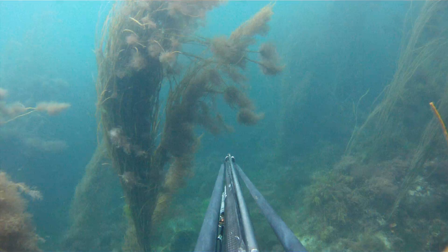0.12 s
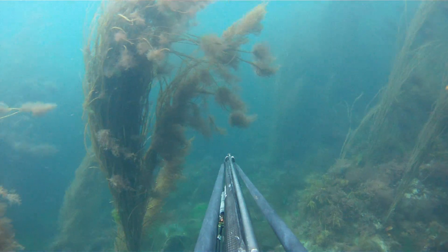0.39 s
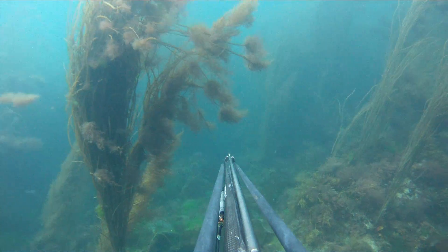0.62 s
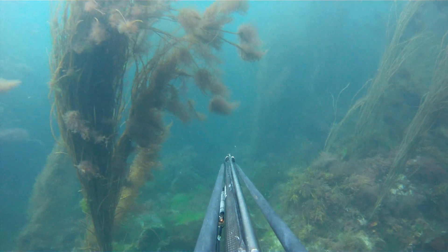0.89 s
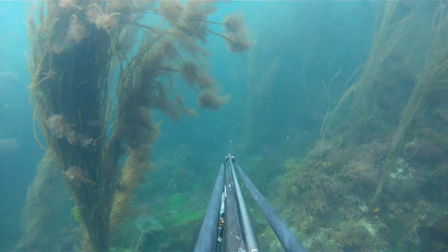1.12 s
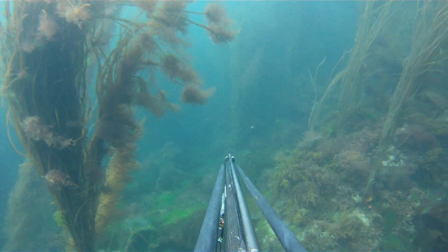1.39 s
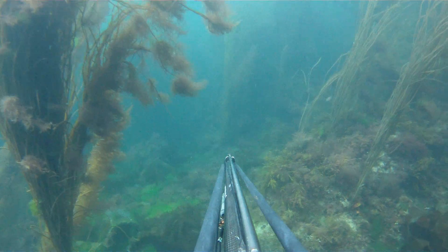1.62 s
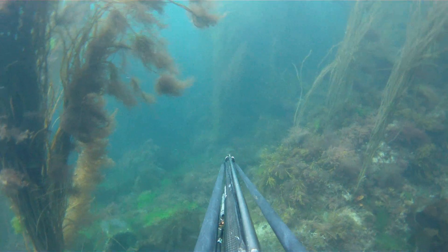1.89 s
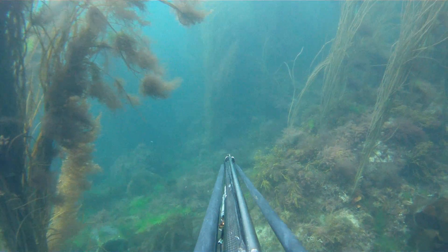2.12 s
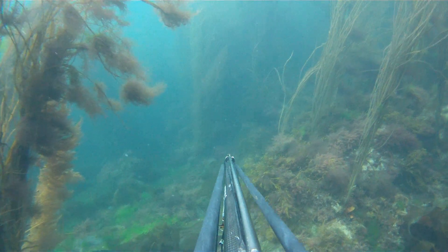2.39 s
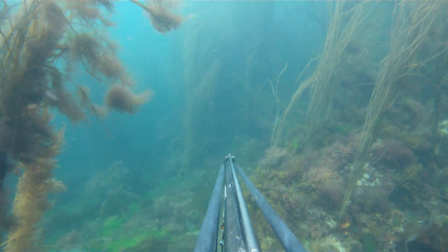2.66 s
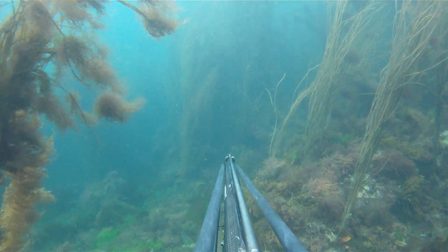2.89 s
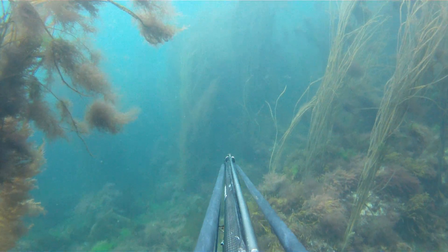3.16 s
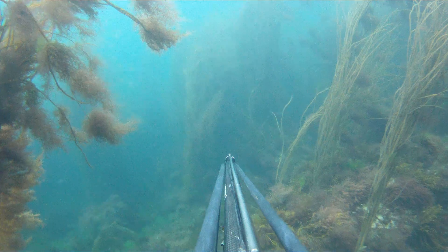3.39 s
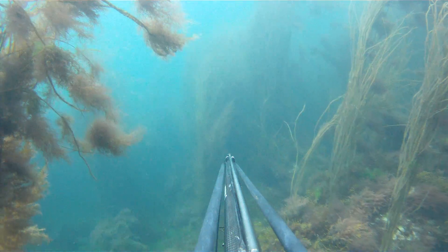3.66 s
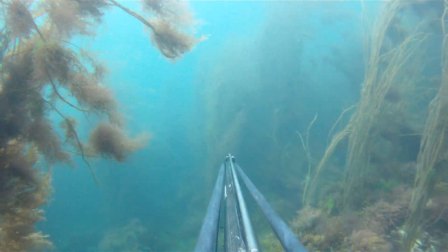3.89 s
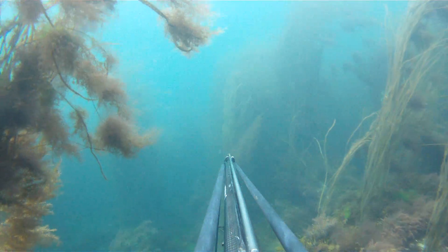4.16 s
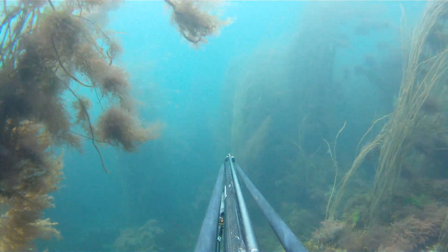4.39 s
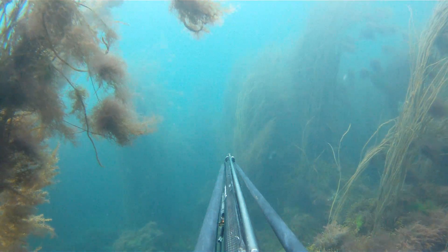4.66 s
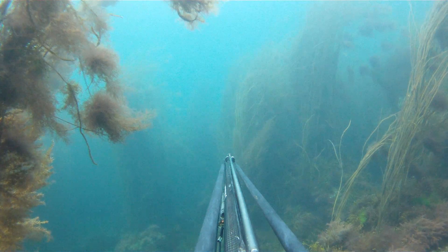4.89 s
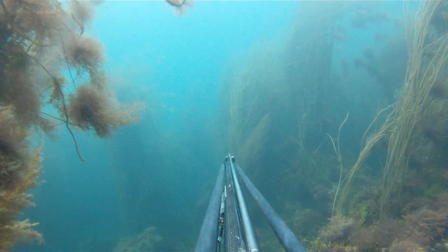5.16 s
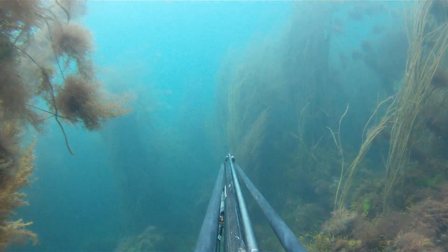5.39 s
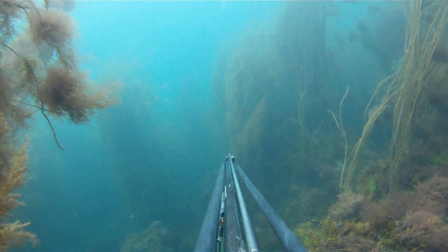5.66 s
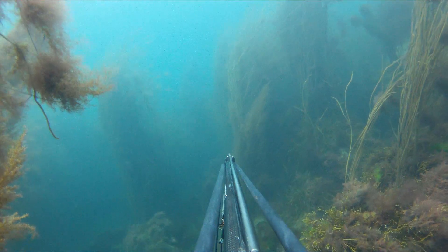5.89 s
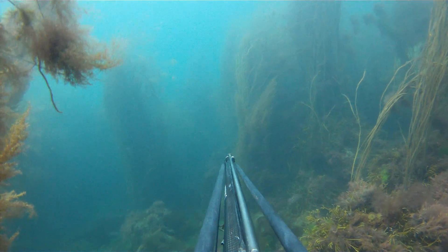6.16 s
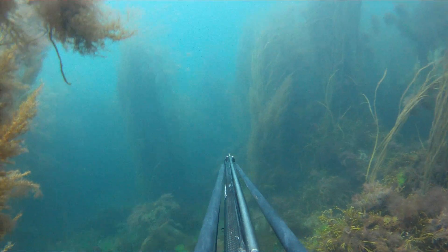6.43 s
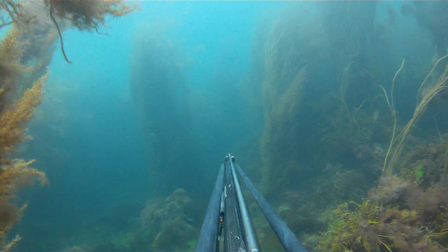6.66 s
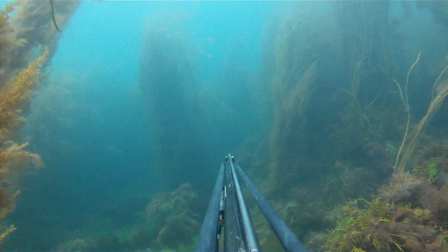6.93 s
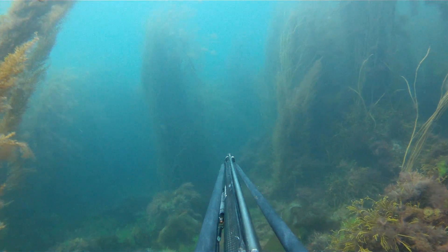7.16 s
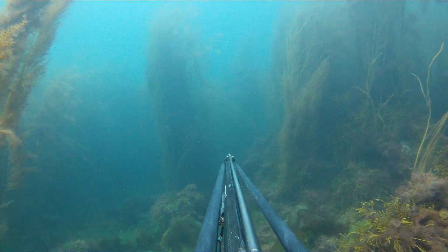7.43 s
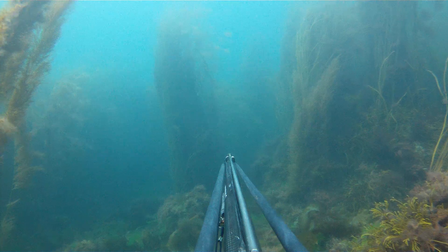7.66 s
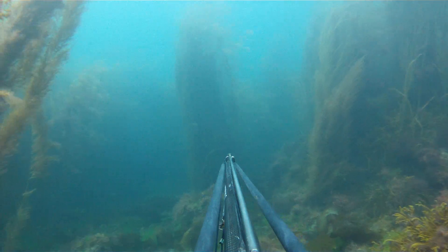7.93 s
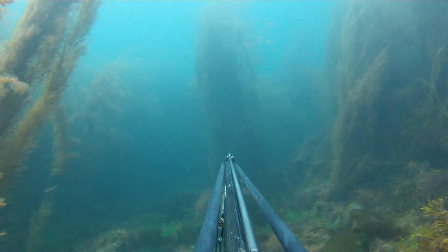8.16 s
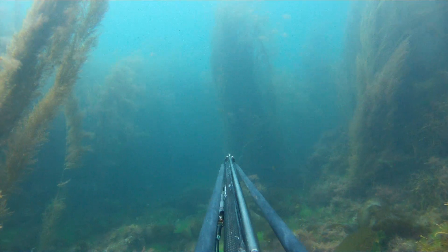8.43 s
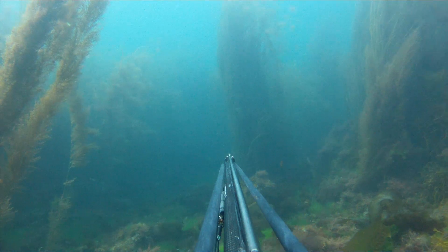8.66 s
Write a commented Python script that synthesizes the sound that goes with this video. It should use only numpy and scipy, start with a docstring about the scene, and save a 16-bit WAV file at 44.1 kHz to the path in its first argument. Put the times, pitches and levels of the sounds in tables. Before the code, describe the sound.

A diver's camera drifts through kelp, its one enclosed microphone giving a close, boxy, low-fidelity sound. Irregular taps and scraping from hand and gear come first over deep surging water. The handling settles, a hard crack breaks the quiet, then only faint clicks and scrapes remain until a weed brushes along the case and little bubbles plink away.

```python
"""Water rumbles deeply round a sealed plastic case while hand, gear and grit rub and tap it; later a hard snap,
a frond's slide and pinging bubbles. A camera in this case drifts through kelp on a diver's spear shaft.
Contacts are short forces driving damped modes of the case; water and friction are noise through resonances.
One microphone hears it all; its converter holds each sample at a low rate, mirroring the sound into the treble."""
import sys
import numpy as np
from scipy import signal
from scipy.fft import rfft, irfft
from scipy.io import wavfile
from scipy.ndimage import uniform_filter1d

SR = 44100
rng = np.random.default_rng(int(sys.argv[2]) if len(sys.argv) > 2 else 0)


def master(y):
    """Save y as 16-bit WAV."""
    cut = np.clip(np.atleast_2d(y).T, -1, 1)
    pcm = np.round(cut * 32767)  # scale
    wavfile.write(sys.argv[1], SR, pcm.astype(np.int16))


def convert_level_to_amplitude(level_db):
    """Map a level in decibels to its linear amplitude factor."""
    exponent = np.asarray(level_db, float) / 20
    return 10 ** exponent


N = 388080  # samples, 8.8 s
TIME = np.arange(N) / SR


def resonate(x, hz, t60):
    """Linear resonance: x drives one exponentially decaying mode; a unit impulse rings with peak about 1."""
    pole = np.exp(2j * np.pi * hz / SR - np.log(1000) / (t60 * SR))
    return signal.lfilter([1], [1, -pole], x).imag


def unit(x):
    """Normalisation: scale to rms 1."""
    return x / np.sqrt(np.mean(x ** 2))


def band(x, hz, width):
    """Bandwidth and decay are reciprocal: a resonance of given width in Hz, scaled to rms 1."""
    return unit(resonate(x, hz, np.log(1000) / (np.pi * width)))


def walk(rate):
    """Slow random modulation: levels held 1 / rate s and slewed twice; spread 1."""
    k = int(SR / rate)
    steps = np.repeat(rng.standard_normal(N // k + 1), k)
    slewed = uniform_filter1d(uniform_filter1d(steps, k), k)
    return unit(slewed[:N])


def curves(table):
    """Envelopes: gains at every sample, interpolated in dB, from each level column of a table."""
    s, *columns = np.transpose(table)
    return [convert_level_to_amplitude(np.interp(TIME, s, c)) for c in columns]


def add(out, s, x):
    """Superposition: mix a short sound in at time s."""
    i = int(s * SR)
    out[i:i + len(x)] += x[:N - i]


def ring(modes, turn, rise_s):
    """Modal superposition: modes struck together, each with its own phase; the contact takes rise_s to build."""
    hz, db, t60 = np.transpose(modes)[:, :, None]
    t = TIME[:SR // 4]
    tones = convert_level_to_amplitude(db - 60 * t / t60) * np.sin(2 * np.pi * (hz * t + np.reshape(turn, (-1, 1))))
    return tones.sum(axis=0) * (1 - np.exp(-t / rise_s))


# lower, hollow-sounding modes of the case: (frequency [Hz], level [dB], t60 [s])
HOLLOW_MODES = [(282.6, -5, 0.052), (503, -7.5, 0.052), (625.3, -0.5, 0.046), (721.6, -0.5, 0.055),
                (790, -0.5, 0.03)]
REGRIP_S, REGRIP_HZ, REGRIP_T60_S = 3.45, 830, 0.089  # the grip shifts and a main mode rises


def hollow_at(s):
    """Boundary conditions set the modes: the hollow modes as the grip at time s leaves them."""
    if s < REGRIP_S:
        return HOLLOW_MODES
    raised = (REGRIP_HZ, HOLLOW_MODES[3][1], REGRIP_T60_S)
    return HOLLOW_MODES[:3] + [raised] + HOLLOW_MODES[4:]


# upper modes of the case: (frequency [Hz], level [dB], t60 [s])
UPPER_MODES = [(1092, 1.5, 0.032), (1366, 3.5, 0.015), (1600, -3.5, 0.016), (2020, -1.5, 0.02),
               (2280, 1.5, 0.016), (2650, -1, 0.021), (3090, -3.5, 0.017), (3420, -5.5, 0.023),
               (3950, -9.5, 0.0079), (4780, -11.5, .012), (5240, -16.5, 0.024)]
# listed taps on the case:
# (time [s], hollow ring peak [dB], upper ring [dB re hollow], where the upper ring is strongest [Hz])
CASE_TAPS = [(0.112, -37, -5.5, 2650), (0.142, -47.5, 7, 2470), (0.219, -32, -5, 2380),
             (0.288, -31.5, -15, 2260), (0.298, -36, -3, 2020), (0.314, -24, -1, 2750),
             (0.347, -32.5, 2.5, 1400), (0.367, -38, -3, 1250), (0.456, -44.5, 5.5, 2500),
             (0.55, -28.5, 0, 1430), (0.578, -28.5, -6.5, 1550), (0.679, -37, 3, 1280),
             (0.854, -37.5, 2.5, 1400), (0.904, -40, 3, 2220), (0.924, -29.5, -3, 1250),
             (1.052, -30.5, -16, 1440), (1.082, -36, 2.5, 2280), (1.103, -27.5, -17, 1870),
             (1.18, -31.5, -6.5, 1270), (1.435, -30.5, -26, 2590), (1.677, -32.5, -14, 1800),
             (1.826, -38, 1, 2400), (1.853, -41, 0, 1310), (1.926, -38, 0.5, 2400), (1.937, -18, -14, 2230),
             (1.96, -33, -16, 1870), (1.973, -29.5, -19, 2200), (2.088, -30.5, -21, 1260),
             (2.236, -38, -1, 1840), (2.446, -44.5, 2, 2510), (2.871, -39, -2, 1250),
             (2.975, -41.5, -13, 1450), (3.111, -38.5, 5.5, 2400), (3.607, -41, -29, 1250),
             (3.746, -42, -1.5, 1467), (3.814, -43, -2, 1450), (3.908, -41, -9, 2040),
             (4.225, -41.5, -4.5, 2760), (4.267, -39, -2, 2480), (4.689, -44.5, -7, 2190),
             (4.913, -49, -5, 2980), (5.067, -46.5, 1.5, 2890), (5.229, -47, 2.5, 2310),
             (5.465, -47.5, 2, 2520), (5.554, -47.5, 2.5, 1630), (5.625, -37.5, -12, 1310),
             (6.015, -44, 5, 1460), (6.254, -42, 2, 1480), (6.288, -41.5, 3.5, 1400),
             (6.514, -43.5, 0, 3000), (6.61, -44, -1, 1250), (7.009, -44, -3.5, 2300),
             (7.084, -39.5, -8, 1290), (7.57, -44.5, -7.5, 1580), (7.706, -47, -0.5, 2400),
             (8.456, -34, -3, 1250), (8.546, -34, -10, 1270)]
FOCUS_DB_PER_OCTAVE = 7  # fall of the upper modes away from that frequency
CRACK_DB = -9.5  # dry contact crack re the upper ring


def taps():
    """Impact excitation: the place struck sets the mix of modes, slightly detuned; a rough contact drives them."""
    out = np.zeros(N)
    rows = CASE_TAPS + light_taps()
    chance = rng.standard_normal((200, 2, 3, len(UPPER_MODES)))
    rough = rng.standard_normal((200, 400)) ** 3 * np.exp(-TIME[:400] / 0.0015)  # spiky force
    bright = signal.butter(2, (2500, 5800), "band", fs=SR, output="sos")
    for (s, db, upper_db, focus_hz), draw, force in zip(rows, chance, rough):
        upper = [(hz, m - FOCUS_DB_PER_OCTAVE * abs(np.log2(hz / focus_hz)), t60)
                 for hz, m, t60 in UPPER_MODES]
        groups = ((hollow_at(s), db), (upper, db + upper_db))
        for (modes, group_db), (detune, spot, turn) in zip(groups, draw):
            struck = [(hz * (1 + .04 * a), m + 2.14 * b, t60)
                      for (hz, m, t60), a, b in zip(modes, detune, spot)]
            response = ring(struck, .15 * turn[:len(modes)], 0.00016)
            x = signal.fftconvolve(response, force)
            add(out, s, convert_level_to_amplitude(group_db) * x / np.abs(x).max())
        crack = signal.sosfilt(bright, force)
        add(out, s, convert_level_to_amplitude(db + upper_db + CRACK_DB) * crack / np.abs(crack).max())
    return out


LIGHT_RUBBING = (14, 9.4)  # while rubbing: (taps per s, mean peak dB re hollow rubbing)
LIGHT_SETTLED = (4, -51.5)  # afterwards: (taps per s, mean peak dB)
LIGHT_SCATTER_DB, LIGHT_UPPER_DB, LIGHT_UPPER_SCATTER_DB = 2.5, -7.5, 4
LIGHT_FOCUS_HZ = (1250, 2600)  # range


def light_taps():
    """Poisson process: tap rows at random gaps, following the rubbing level, then faint and sparse."""
    rub_s, rub_db = np.transpose(RUBBING)[:2]
    gaps, spots = rng.exponential(size=(2, 80)), rng.random((2, 80))
    sizes = rng.standard_normal((2, 2, 80))
    rows = []
    low, high = LIGHT_FOCUS_HZ
    spans = ((0, rub_s[-1], LIGHT_RUBBING), (rub_s[-1], N / SR, LIGHT_SETTLED))
    for (start, end, (per_s, db)), gap, spot, (size, edge) in zip(spans, gaps, spots, sizes):
        s = start + np.cumsum(gap) / per_s
        peak_db = db + LIGHT_SCATTER_DB * size
        if start == 0:
            peak_db = peak_db + np.interp(s, rub_s, rub_db)
        upper_db = LIGHT_UPPER_DB + LIGHT_UPPER_SCATTER_DB * edge
        focus_hz = low * (high / low) ** spot
        rows += [row for row in zip(s, peak_db, upper_db, focus_hz) if row[0] < end]
    return rows


def grit(modes, per_s, scatter_db, bunch_db):
    """Stick-slip: ticks of scattered size, in bunches, each exciting the modes differently; rms 1."""
    at = rng.random(N) < per_s / SR
    size_db = scatter_db * np.minimum(rng.exponential(size=N), 3.5)
    ticks = at * convert_level_to_amplitude(size_db + bunch_db * walk(45))
    # contact shortens every ring to 0.74 of its listed t60
    return unit(sum(convert_level_to_amplitude(db) * resonate(ticks * rng.standard_normal(N), hz, 0.74 * t60)
                    for hz, db, t60 in modes))


# rubbing on the case: (time [s], hollow part [dB], bright part [dB])
RUBBING = [(0.0, -51.5, -66), (0.15, -54, -61.5), (0.51, -51.5, -54), (1.05, -46.5, -54),
           (1.35, -50, -61.5), (1.66, -45.5, -63.5), (2.01, -51, -61.5), (2.26, -56.5, -65.5),
           (2.87, -62.5, -71.5), (3.12, -55, -63.5), (3.3, -66, -67.5)]
# short scrapes of grit across the case: (time [s], length [s], bright part [dB])
GRIT_SCRAPES = [(0.579, 0.057, -57.5), (1.959, 0.026, -55.5), (3.196, 0.054, -58), (3.747, 0.086, -65),
                (4.491, 0.11, -65), (5.012, .08, -66), (5.277, 0.029, -66), (6.288, .06, -63),
                (7.083, 0.059, -65.5), (7.705, 0.077, -65.5)]
SCRAPE_HOLLOW_DB, SCRAPE_EDGE_S = 5, 0.01  # hollow part re bright part; fade at each end
RUB_TICKS_PER_S, RUB_SCATTER_DB = 1100, 4
GRIT_TICKS_PER_S, GRIT_SCATTER_DB = 600, 4
# lone grains that still tick once the rubbing has stopped
DRIFT_TICKS_PER_S, DRIFT_SCATTER_DB, DRIFT_HOLLOW_DB, DRIFT_BRIGHT_DB = 159.5, 3.5, -72, -74.5


def rub():
    """Friction excitation: hand and gear rub the hollow modes, fine grit the upper, until the grip settles."""
    settled = np.clip((TIME - RUBBING[-1][0]) / 0.039, 0, 1)
    scraping = 0
    for s, length, db in GRIT_SCRAPES:
        inside = np.minimum(TIME - s, s + length - TIME)
        scraping = scraping + convert_level_to_amplitude(db) * np.clip(inside / SCRAPE_EDGE_S + .5, 0, 1)
    hollow_gain, bright_gain = ((1 - settled) * gain for gain in curves(RUBBING))
    hollow_gain = hollow_gain + convert_level_to_amplitude(SCRAPE_HOLLOW_DB) * scraping
    bright_gain = bright_gain + scraping
    rubbing = (hollow_gain * grit(HOLLOW_MODES, RUB_TICKS_PER_S, RUB_SCATTER_DB, 2.2)
               + bright_gain * grit(UPPER_MODES, GRIT_TICKS_PER_S, GRIT_SCATTER_DB, 2.85))
    last_modes = hollow_at(N / SR)
    drifting = (convert_level_to_amplitude(DRIFT_HOLLOW_DB) * grit(last_modes, DRIFT_TICKS_PER_S, DRIFT_SCATTER_DB, 4.0)
                + convert_level_to_amplitude(DRIFT_BRIGHT_DB) * grit(UPPER_MODES, DRIFT_TICKS_PER_S, DRIFT_SCATTER_DB, 2.3))
    return rubbing + settled * drifting


# one hard snap, push, release the other way, then rebounds: (time [s], level [dB])
SNAP_CONTACTS = [(3.9944, -8.5), (3.9949, -2.5), (3.9962, -12.5), (3.9966, -22), (3.998, -28)]
# modes it rings: (frequency [Hz], level [dB], t60 [s])
SNAP_RING = [(150, -14, 0.029), (232, -21, 0.051), (420, -20, 0.018), (805, -9.5, 0.021),
             (1090, -5.5, 0.0084), (1550, -2, 0.006), (2040, 0, .011), (2750, -6.5, 0.0092),
             (3410, -9, .006), (4600, -1, 0.0031), (5600, -12.5, 0.0047)]


def snap():
    """Step forcing: modes start in step and reverse on release; rebounds catch them out of step."""
    out = np.zeros(N)
    turns = rng.random((len(SNAP_CONTACTS), len(SNAP_RING)))
    turns[:2] = [[0], [.5]]  # in cycles: push, then reversed
    for (s, db), turn in zip(SNAP_CONTACTS, turns):
        add(out, s, convert_level_to_amplitude(db) * ring(SNAP_RING, turn, .00015))
    return out


# soft bumps of the whole rig: (time [s], peak [dB], frequency [Hz], t60 [s])
RIG_BUMPS = [(0.09, -51, 110, 0.13), (0.68, -33.5, 105, .4), (0.97, -33, 113.4, 0.14),
             (2.6, -36.5, 111.4, 0.066), (3.605, -40.5, 277, 0.039), (4.047, -34.5, 111.7, 0.144),
             (4.5, -39, 100.1, 0.46), (8.068, -45, 294, 0.037), (8.07, -26.5, 120, 0.061),
             (8.48, -38.5, 85, .3)]
# small bubbles let go near the case: (time [s], peak [dB], frequency [Hz], t60 [s])
SMALL_BUBBLES = [(4.522, -39.5, 614, 0.041), (4.548, -40.5, 477, 0.033), (4.588, -42, 570, 0.023),
                 (4.658, -45.5, 970, 0.02), (5.04, -52.5, 1150, 0.074), (5.07, -49, 420, 0.13),
                 (8.462, -39.5, 3820, 0.011), (8.519, -41, 3000, 0.019), (8.533, -49, 5680, .02),
                 (8.585, -42.5, 1220, 0.052), (8.6095, -26, 2605, 0.017), (8.6185, -34, 3580, 0.016),
                 (8.646, -33, 1230, 0.088), (8.657, -43, 3430, .04), (8.667, -38, 2650, 0.019),
                 (8.6787, -30.5, 1880, 0.03), (8.736, -39.5, 2360, 0.059), (8.7865, -41.5, 1710, 0.041),
                 (8.79, -40, 1150, .08)]


def bumps_and_bubbles():
    """Damped oscillators: rig bumps build slowly, bubbles start faster; all waver raggedly as they ring."""
    out = np.zeros(N)
    for table, rise_cycles in ((RIG_BUMPS, 1.3), (SMALL_BUBBLES, .9)):
        noises = rng.standard_normal((len(table), SR // 4))
        for (s, db, hz, t60), noise in zip(table, noises):
            waver = uniform_filter1d(noise, int(1.5 * SR / hz)) * np.sqrt(1.5 * SR / hz)
            x = ring([(hz, 0, t60)], 0, rise_cycles / hz) * (1 + 0.27 * waver)
            add(out, s, convert_level_to_amplitude(db) * x / np.abs(x).max())
    return out


# a frond slides along the case: (time [s], dull part [dB], bright part [dB])
FROND_SLIDE = [(8.13, -75, -76), (8.2, -80, -67), (8.215, -58.5, -55.5), (8.32, -56.5, -52.5),
               (8.35, -45.5, -53), (8.44, -48.5, -59), (8.56, -47, -59), (8.59, -51.5, -70),
               (8.8, -62, -70)]
# resonances of the dull part: (frequency [Hz], width [Hz], level [dB])
DULL_RESONANCES = [(337, 190, -7.5), (565, 140, -4.5), (853, 33, -1.5), (1150, 100, -1.5)]
# resonances of the bright part: (frequency [Hz], width [Hz], level [dB])
BRIGHT_RESONANCES = [(1630, 340, 2.5), (2050, 390, 2.5), (2440, 120, 1), (3000, 320, -11.5),
                     (3890, 250, -5.5)]


def slide():
    """Friction noise: rough forcing drives resonances that each flicker alone."""
    out = 0
    for gain, resonances in zip(curves(FROND_SLIDE), (DULL_RESONANCES, BRIGHT_RESONANCES)):
        catch = convert_level_to_amplitude(2.7 * walk(150))  # the frond catches and slips
        noise = sum(convert_level_to_amplitude(db + 2.6 * walk(40)) * band(catch * rng.standard_normal(N), hz, width)
                    for hz, width, db in resonances)
        out = out + gain * unit(noise)
    return out


# dry clicks that hardly ring the case, perhaps snapping shrimp: (time [s], peak [dB])
DRY_CLICKS = [(0.316, -31.5), (0.529, -42), (3.7696, -34), (3.7945, -32), (3.799, -32.5), (6.256, -46),
              (6.516, -51)]
CLICK_BAND_HZ, CLICK_DECAY_S = (900, 5400), 0.0016


def clicks():
    """Brief impulses have wide spectra: bursts of spikes over a wide band, gone in a few ms."""
    out = np.zeros(N)
    wide = signal.butter(2, CLICK_BAND_HZ, "band", fs=SR, output="sos")
    for (s, db), noise in zip(DRY_CLICKS, rng.standard_normal((len(DRY_CLICKS), 500))):
        x = signal.sosfilt(wide, noise ** 3 * np.exp(-TIME[:500] / CLICK_DECAY_S))
        add(out, s, convert_level_to_amplitude(db) * x / np.abs(x).max())
    return out


# water flowing round the case: (time [s], deep surge [dB], slosh [dB])
WATER_FLOW = [(0.0, -48, -52), (0.14, -39.5, -45), (0.24, -48, -50.5), (0.66, -43.5, -44),
              (1.74, -42.5, -43), (2.3, -44, -48.5), (3.5, -58, -60.5), (3.63, -44, -58), (4.1, -49.5, -52),
              (4.78, -53.5, -58), (5.71, -51, -57.5), (6.01, -48, -60.5), (6.47, -47.5, -58.5),
              (6.77, -61.5, -63.5), (7.05, -53.5, -59), (8.1, -48, -63.5), (8.5, -54.5, -40.5),
              (8.8, -50.5, -60.5)]
# slosh resonances: (frequency [Hz], width [Hz], level [dB])
SLOSH_RESONANCES = [(105, 55, -1.5), (166, 81, -9.5), (244, 81, -6.5)]
SURGE_HZ, SURGE_WIDTH_HZ = 41.7, 18.6


def flow():
    """Turbulent forcing: eddies rock the case at a deep resonance; water sloshes unevenly in wider ones."""
    surge_gain, slosh_gain = curves(WATER_FLOW)
    eddies = band(rng.standard_normal(N), SURGE_HZ, SURGE_WIDTH_HZ)
    surge = band(eddies, SURGE_HZ, 2 * SURGE_WIDTH_HZ)
    slosh = sum(convert_level_to_amplitude(db + 2.9 * walk(14)) * band(rng.standard_normal(N), hz, width)
                for hz, width, db in SLOSH_RESONANCES)
    return surge_gain * surge + slosh_gain * unit(slosh)


def coloured(spectrum):
    """Spectral shaping: steady noise of rms 1 with the given (Hz, dB) spectrum."""
    hz, db = np.transpose(spectrum)
    f = np.fft.rfftfreq(N, 1 / SR) + 1  # 1 Hz up, to keep the logarithm finite
    gain = convert_level_to_amplitude(np.interp(np.log(f), np.log(hz), db))
    return unit(irfft(rfft(rng.standard_normal(N)) * gain, N))


# shape of the steady hiss: (frequency [Hz], relative density [dB per Hz])
HISS_SPECTRUM = [(150, -12), (250, -16), (500, -23), (1000, -27.5), (2000, -31.5), (3500, -31.5),
                 (5000, -33), (5600, -37.5), (6000, -50)]


def hiss():
    """Stationary noise: the hiss of sea and electronics, at a fixed rms level."""
    return convert_level_to_amplitude(-62) * coloured(HISS_SPECTRUM)


def scene():
    """Superposition: all sources add at the single microphone, copied to both channels."""
    contacts = taps() + rub() + snap() + bumps_and_bubbles() + slide() + clicks()
    return np.tile(contacts + flow() + hiss(), (2, 1))


def band_limit(x):
    """A steep low-pass at the top of the band."""
    return signal.sosfilt(signal.butter(12, 15790, fs=SR, output="sos"), x)


CONVERTER_DB = -71.5  # white noise of each channel's own converter, before the 12 kHz sampling
TOP_HZ = 15600  # first low-pass of the treble; a steeper one follows


def record(dry):
    """Zero-order hold: 12 kHz samples held four steps of a 48 kHz clock leave images about 12 kHz multiples."""
    noisy = dry + convert_level_to_amplitude(CONVERTER_DB) * rng.standard_normal(dry.shape)
    slow = signal.resample_poly(noisy, 40, 147, axis=1)  # 44.1 to 12 kHz; images mirror about 6 and 12 kHz
    steps = np.repeat(slow, 4, axis=1)
    held = signal.resample_poly(steps, 147, 160, axis=1)[:, :N]  # 48 to 44.1 kHz
    held = signal.sosfilt(signal.butter(8, TOP_HZ, fs=SR, output="sos"), held)
    mix = np.clip(held, -1, 1)
    return band_limit(mix)


dry = scene()
out = record(dry)
master(out)
```